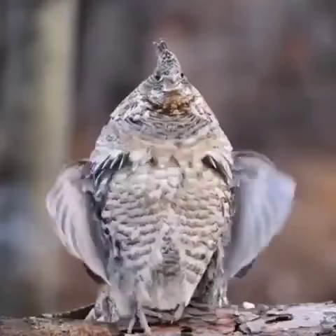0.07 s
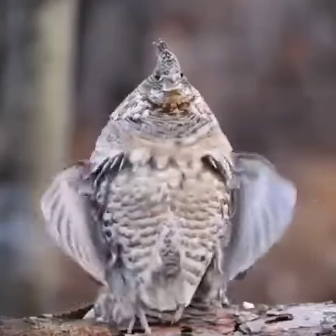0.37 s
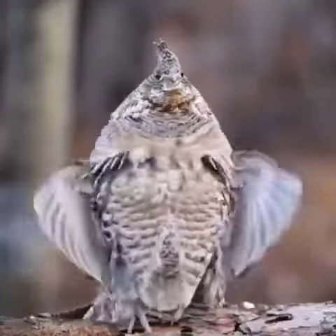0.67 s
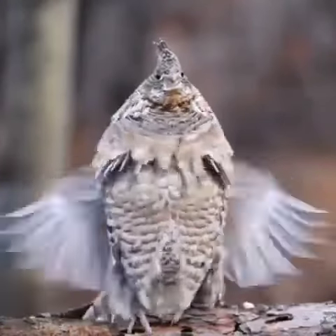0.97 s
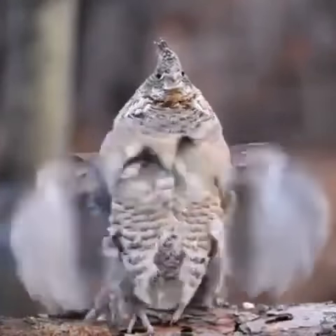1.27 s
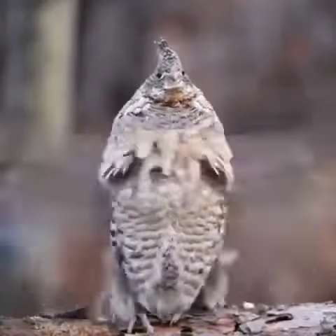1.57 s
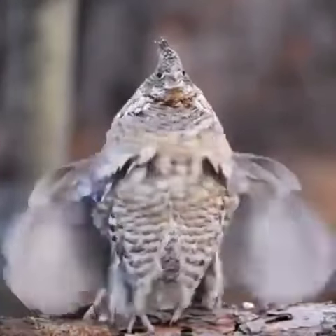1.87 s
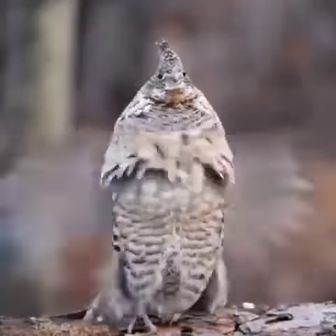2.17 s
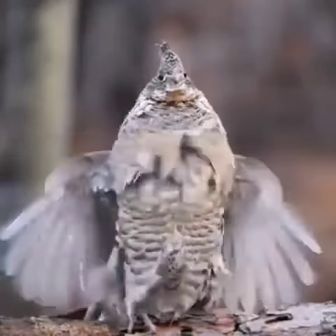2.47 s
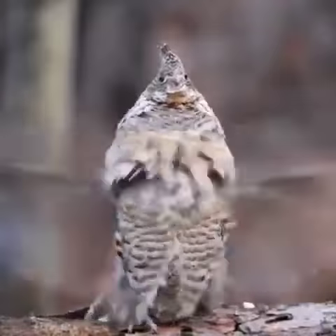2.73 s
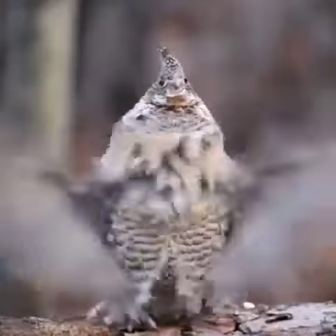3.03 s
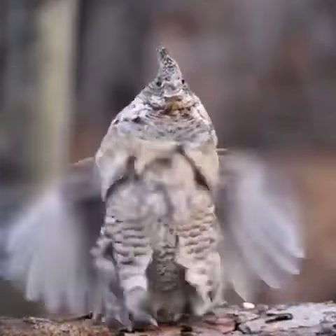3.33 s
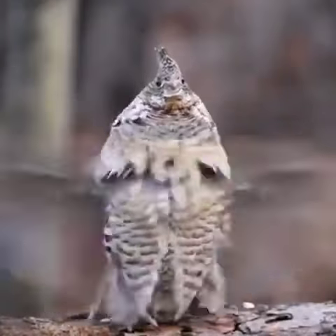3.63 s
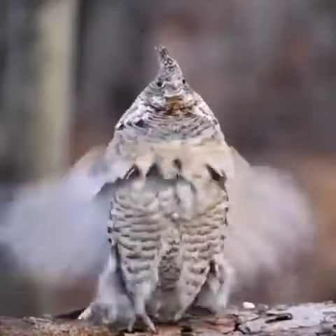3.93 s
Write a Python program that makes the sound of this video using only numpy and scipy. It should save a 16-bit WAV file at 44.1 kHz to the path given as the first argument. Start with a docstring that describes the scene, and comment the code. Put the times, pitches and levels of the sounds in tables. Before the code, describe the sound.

Low, muffled wingbeat thumps from a nearby grouse accelerate into a rapid drumming roll.

```python
"""A quiet wood: the air murmurs, a small bird whistles far off, a ruffed grouse drums on a log close by.
Its wingbeats speed up into a roll. Each stroke shoves the air into one deep thump,
with a swish of feathers and a tiny snap as the wings stop; a few strokes also clap.
Nearby trees return faint low echoes and the trunks scatter a short tail."""
import sys
import numpy as np
from scipy import signal
from scipy.fft import rfft, irfft, next_fast_len
from scipy.io import wavfile
from scipy.ndimage import map_coordinates

SR = 44100
rng = np.random.default_rng(int(sys.argv[2]) if len(sys.argv) > 2 else 0)


def persist_wave(psi):
    """Save psi, clipped to +-1, as 16-bit WAV."""
    counts = np.round(np.clip(psi, -1, 1) * 32767).astype(np.int16)
    wavfile.write(sys.argv[1], SR, np.atleast_2d(counts).T)


N = 176400

# still wood (frequency [Hz], relative density [dB])
AIR_SPECTRUM = [(20, 0), (55, 4.5), (90, -0.5), (140, -24), (220, -24.5), (500, -29), (800, -30),
                (1100, -38), (1550, -42), (2300, -48.5), (4000, -53.5), (14000, -57)]
# far songbird (start [s], length [s], pitch [Hz], level [dB])
SONGBIRD_NOTES = [(.09, 0.069, 6970, -81), (0.893, 0.068, 6760, -76), (0.978, 0.054, 6900, -77),
                  (1.11, .08, 6550, -76.5), (2.657, .085, 6840, -77), (2.793, 0.064, 6720, -78)]
# decay among the trunks (frequency [Hz], T60 [s])
SCATTER_T60 = [(50, .55), (200, .35), (1000, 0.22), (10000, .2)]
# echoes off nearby trees (delay [s], gain [dB])
TREE_PATHS = [(.040, -29.5), (.0852, -25), (.0987, -34), (.14, -38)]
# wing noises, each (frequency [Hz], relative density [dB])
EDDY_SPECTRUM = [(40, -26), (110, -4), (150, 2), (205, -1), (300, -14), (420, -20), (700, -34), (1500, -66)]
SWISH_SPECTRUM = [(150, -13), (450, 0), (800, -2), (1750, -3.5), (2600, -16), (3600, -13.5), (4400, -17),
                  (5700, -13), (7600, -16.5), (10500, -20.5), (14000, -22)]
SNAP_SPECTRUM = [(300, -25.5), (900, -1.5), (1800, 3), (2700, -5), (4400, -4.5), (5900, 3), (8000, -1.5),
                 (11000, -7), (14000, -7)]
CLAP_SPECTRUM = [(300, -14), (700, -4), (1100, 7), (1750, 3), (2700, -12), (4400, -13), (6200, -3),
                 (8000, -7), (14000, -20)]
# strokes with a dry clap (time [s], level [dB])
WING_CLAPS = [(.1703, -38), (.495, -36), (3.3568, -43), (3.716, -44), (3.8009, -44), (3.8918, -42),
              (3.9473, -41)]
# how hard the grouse works (time [s], relative level [dB])
WING_EFFORT = [(0, -9), (1.1, -13), (2.1, -6), (3.0, -1), (3.3, 1), (3.6, -4), (3.95, -6)]
# wing turnover, most abrupt at the height of the roll (time [s], Gaussian width [ms])
TURN_WIDTHS = [(0, 2.96), (2.8, 3.3), (3.15, 3.0), (3.3, 1.9), (3.42, 2.9), (3.95, 3.3)]
# strokes (time [s], thump peak [dB], relative swish level [dB], relative snap level [dB])
WINGBEATS = [(0.171,-3.5,-54.5,-61), (0.4954,-4,-53,-60), (0.794,-4,-55.5,-53), (1.061,-4.2,-56.5,-58),
             (1.3031,-4.2,-54.5,-55.5), (1.5224,-4.4,-56,-59), (1.7232,-4.4,-54.5,-55),
             (1.9077,-4.3,-53.5,-53), (2.0764,-3.8,-55.5,-56), (2.2333,-4.1,-53.5,-58),
             (2.3768,-4,-53.5,-48), (2.5104,-4,-54.5,-60), (2.6338,-4,-54.5,-52.5), (2.747,-4,-55,-56),
             (2.8513,-4.3,-52.5,-51), (2.948,-4.8,-54.5,-55.5), (3.0363,-5.5,-51.5,-45.5),
             (3.1162,-5.1,-51.5,-48), (3.1866,-4.9,-51.5,-45.5), (3.2478,-4.7,-53,-48),
             (3.3008,-5.9,-54,-51), (3.3576,-5.9,-55,-48), (3.4218,-6.5,-55,-47), (3.4898,-6.2,-57,-49),
             (3.5611,-6.8,-54,-50.5), (3.6366,-6.8,-55.5,-48), (3.717,-6.7,-53.5,-49),
             (3.8018,-6,-52.5,-53), (3.8919,-7.5,-52.5,-53), (3.9485,-8,-53.5,-44.5)]

AIR_DB, TOP_HZ = -46.5, 14000
WHISTLE_SAG_HZ_PER_S, WHISTLE_WAVER_HZ = 830, 70
THUMP_WET_DB, FEATHER_WET_DB, BIRD_WET_DB = -28, -18, 1
EDDY_DB, EDDY_DB_PER_EFFORT_DB, EDDY_RISE_S, EDDY_FALL_S = -37, .5, .008, .011
SWISH_TRIM_DB, SWISH_RISE_S, SWISH_FALL_S = 1.8, .0065, .0095
RUFFLE_DB, RUFFLE_RISE_S, RUFFLE_FALL_S = -62.5, .014, .036
FLICK_DB, FLICKS_PER_S = 2.4, 600
SNAP_TRIM_DB, SNAP_LAG_S, SNAP_RISE_S, SNAP_FALL_S = 6, .0009, .00008, .0006
CLAP_FALL_S = .0006
DRIVE_S, BRAKE_S, BRAKE_S_PER_EFFORT_DB = .0066, .00275, .00002
TURN_LEAD_S, TURN_SHARE = .0077, .061
PUFF_DB, PUFF_DB_PER_EFFORT_DB, PUFF_WIDTH_S = -18, .45, .0012  # level relative to the thump
LOW_CUT_HZ, LOW_CUT_Q = 40.54, 1.0

TIME_S = np.arange(N) / SR
STROKE_TIME_S = np.arange(-SR // 6, SR // 6) / SR  # centred on one stroke


def amp(db):
    """Decibels to gain."""
    return 10 ** (np.asarray(db) / 20)


def at_hz(points, hz):
    """Interpolate a table over log frequency."""
    knots_hz, values = np.transpose(points)
    return np.interp(np.log(hz + 1), np.log(knots_hz + 1), values)


def at_time(points, time_s):
    """Interpolate a table over time."""
    return np.interp(time_s, *np.transpose(points))


def wobble(knots_per_s):
    """Smooth random curve."""
    return map_coordinates(rng.standard_normal(int(N * knots_per_s / SR) + 4), [TIME_S * knots_per_s])


def filtered(x, response):
    """Apply a complex frequency response."""
    size = next_fast_len(N + SR // 2)
    return irfft(rfft(x, size) * response(np.fft.rfftfreq(size, 1 / SR)), size)[:N]


def noise(spectrum):
    """Coloured noise, rms 1."""
    x = filtered(rng.standard_normal(N), lambda hz: amp(at_hz(spectrum, hz)))
    return x / np.sqrt(np.mean(x ** 2) + 1e-20)


def add_centred(track, time_s, sound):
    """Mix in a sound centred on time_s."""
    index = round(time_s * SR) - len(sound) // 2 + np.arange(len(sound))
    inside = (index >= 0) & (index < N)
    track[index[inside]] += sound[inside]


def swell(rise_s, fall_s):
    """Rounded peak, exponential rise and fall."""
    return np.exp(-np.logaddexp(-STROKE_TIME_S / rise_s, STROKE_TIME_S / fall_s))


def bursts(times_s, levels_db, rise_s, fall_s):
    """Envelope of swells, summed in power."""
    power, shape = np.zeros(N), swell(rise_s, fall_s)
    for time_s, db in zip(times_s, levels_db):
        add_centred(power, time_s, (amp(db) * shape / shape.max()) ** 2)
    return np.sqrt(power)


def air():
    """Low murmur of the wood; the level drifts slightly."""
    return amp(AIR_DB + .8 * wobble(knots_per_s=3.6)) * noise(AIR_SPECTRUM)


def songbird():
    """Thin, wavering whistles that sag in pitch."""
    out, waver_hz = np.zeros(N), WHISTLE_WAVER_HZ * wobble(knots_per_s=150)
    for start_s, length_s, hz, db in SONGBIRD_NOTES:
        age_s = TIME_S - start_s
        pitch_hz = hz - WHISTLE_SAG_HZ_PER_S * (age_s - length_s / 2) + waver_hz
        envelope = amp(db) * np.sin(np.pi * np.clip(age_s / length_s, 0, 1))
        out += envelope * np.sin(2 * np.pi * np.cumsum(pitch_hz) / SR)
    return out


def trunk_scatter(x):
    """Diffuse tail among the trunks; bass lasts longest."""
    hz, age_s, bins = signal.stft(rng.standard_normal(SR // 2), SR, nperseg=256)
    decay = amp(-60 * age_s / at_hz(SCATTER_T60, hz)[:, None])
    tail = signal.istft(bins * decay, SR, nperseg=256)[1]
    tail *= 1 - np.exp(-np.arange(len(tail)) / SR / .013)  # 13 ms build-up
    return signal.fftconvolve(x, tail / np.linalg.norm(tail))[:N]


def tree_echoes(x):
    """One delayed copy per nearby tree."""
    return filtered(x, lambda hz: sum(amp(db) * np.exp(-2j * np.pi * hz * delay_s)
                                      for delay_s, db in TREE_PATHS))


def feathers():
    """Air eddies and hisses through the wings, plumage ruffles, wings snap to a stop and at times clap."""
    times_s, _, swish_db, snap_db = np.transpose(WINGBEATS)
    effort_db = at_time(WING_EFFORT, times_s)
    eddy_db = EDDY_DB + EDDY_DB_PER_EFFORT_DB * effort_db
    stops_s = times_s + SNAP_LAG_S
    eddies = noise(EDDY_SPECTRUM) * bursts(times_s, eddy_db, EDDY_RISE_S, EDDY_FALL_S)
    swish = noise(SWISH_SPECTRUM) * bursts(times_s, swish_db + SWISH_TRIM_DB, SWISH_RISE_S, SWISH_FALL_S)
    ruffle = noise(SWISH_SPECTRUM) * bursts(times_s, RUFFLE_DB + effort_db, RUFFLE_RISE_S, RUFFLE_FALL_S)
    snaps = noise(SNAP_SPECTRUM) * bursts(stops_s, snap_db + SNAP_TRIM_DB, SNAP_RISE_S, SNAP_FALL_S)
    claps = noise(CLAP_SPECTRUM) * bursts(*np.transpose(WING_CLAPS), SNAP_RISE_S, CLAP_FALL_S)
    flicks = amp(FLICK_DB * wobble(FLICKS_PER_S))  # broken up feather by feather
    return eddies + (swish + ruffle) * flicks + snaps + claps


def wing_thumps():
    """Each stroke radiates the rate of change of its push on the air and ends in a brief puff."""
    out, cut_rad_s = np.zeros(N), 2 * np.pi * LOW_CUT_HZ
    low_cut = signal.bilinear([1, 0, 0], [1, cut_rad_s / LOW_CUT_Q, cut_rad_s ** 2], SR)
    for time_s, peak_db, _, _ in WINGBEATS:
        effort_db = at_time(WING_EFFORT, time_s)
        push = swell(DRIVE_S, BRAKE_S - BRAKE_S_PER_EFFORT_DB * effort_db)
        turn_s = at_time(TURN_WIDTHS, time_s) / 1000  # wings turn over just before the stroke
        turn = TURN_SHARE * np.exp(-.5 * ((STROKE_TIME_S + TURN_LEAD_S) / turn_s) ** 2)
        radiated = np.gradient(turn - push)
        puff_db = PUFF_DB + PUFF_DB_PER_EFFORT_DB * effort_db
        puff = amp(puff_db) * np.exp(-.5 * (STROKE_TIME_S / PUFF_WIDTH_S) ** 2)
        pressure = signal.lfilter(*low_cut, radiated / radiated.max() + puff)
        add_centred(out, time_s, amp(peak_db) * pressure / pressure.max())
    return out


def scene():
    """Wood, songbird and grouse, mono."""
    thumps, rustle, whistles = wing_thumps(), feathers(), songbird()
    send = amp(THUMP_WET_DB) * thumps + amp(FEATHER_WET_DB) * rustle + amp(BIRD_WET_DB) * whistles
    reflections = trunk_scatter(send) + tree_echoes(thumps)
    return (air() + whistles + reflections + rustle + thumps)[None]


def record(dry):
    """Brick-wall low-pass at TOP_HZ."""
    return filtered(dry[0], lambda hz: hz < TOP_HZ)[None]


dry = scene()
out = record(dry)
persist_wave(out)
```